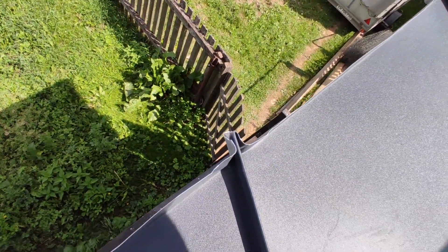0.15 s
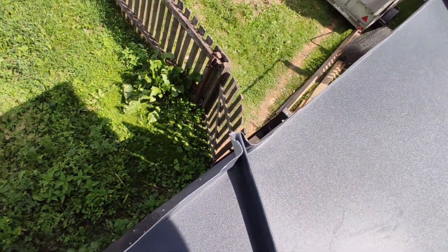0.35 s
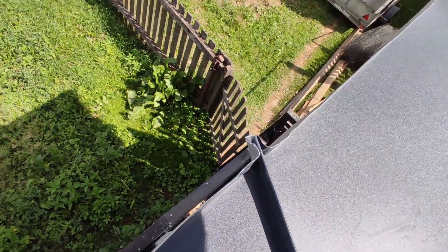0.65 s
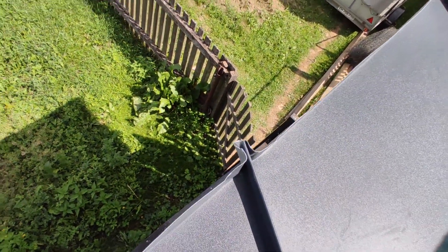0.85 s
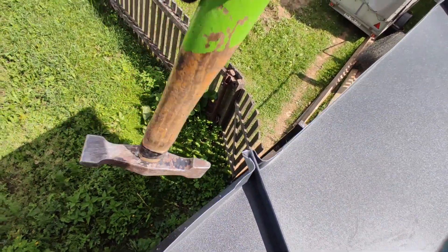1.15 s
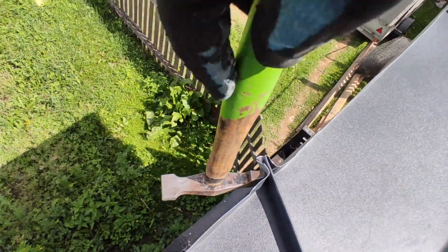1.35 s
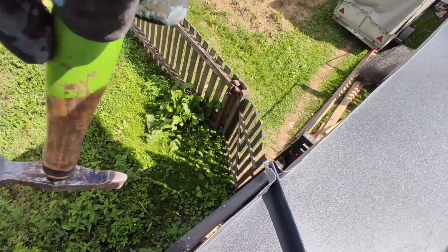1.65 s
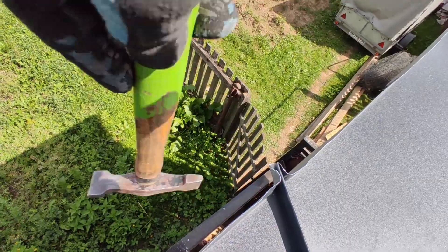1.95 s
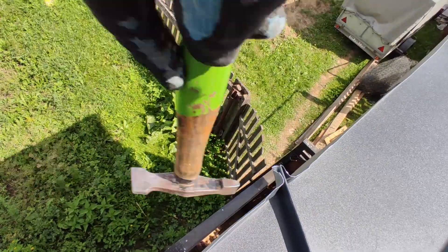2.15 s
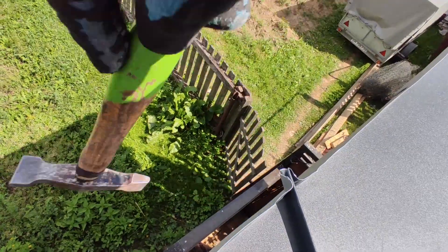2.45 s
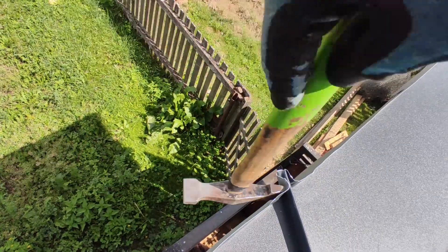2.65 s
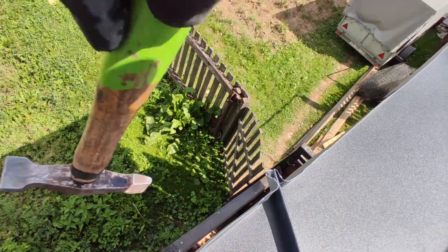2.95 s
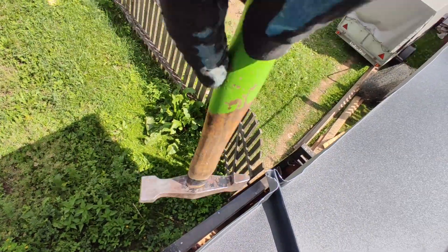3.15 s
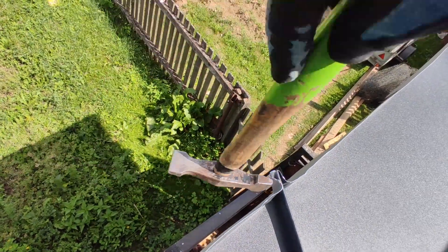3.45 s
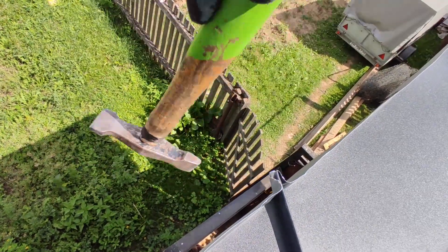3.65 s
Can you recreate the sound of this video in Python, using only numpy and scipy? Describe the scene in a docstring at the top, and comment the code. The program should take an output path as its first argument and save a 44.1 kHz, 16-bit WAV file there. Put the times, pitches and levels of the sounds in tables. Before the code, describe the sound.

A hammer strikes a sheet-metal roof seam six times, close by, at about 1.4, 1.8, 2.2, 2.7, 3.1 and 3.5 seconds. Each hit is a sharp crack with a short metallic boom, most with small rebounds, a thin high ring and a faint echo. In the first second, a sleeve swishes and cloth rustles softly. Light wind rumbles on the microphone throughout, over a quiet outdoor hiss.

```python
"""A small steel hammer strikes a folded sheet-metal roof seam six times, close by on an outdoor roof.
Each contact cracks, then the sheet and the deck below boom; the head rebounds and rings thinly,
and a far wall echoes. Before the work a sleeve swishes and cloth rustles.
Wind buffets the two microphone ports over the hiss of a quiet garden."""
import sys
import numpy as np
from scipy import signal
from scipy.fft import rfft, irfft, next_fast_len
from scipy.io import wavfile
from scipy.ndimage import map_coordinates

SR = 44100
rng = np.random.default_rng(int(sys.argv[2]) if len(sys.argv) > 2 else 0)


def pcm_store(signal):
    """Save signal as 16-bit PCM."""
    levels = np.round(np.clip(np.atleast_2d(signal), -1, 1) * 32767)
    wavfile.write(sys.argv[1], SR, levels.astype(np.int16).T)


N = 167580
TIME = np.arange(N) / SR


def amp(db):
    return 10 ** (np.asarray(db) / 20)


def unit(x):
    return x / np.sqrt(np.mean(x ** 2) + 1e-20)


def along(points, hz):
    """A table's columns read at hz, on a log frequency axis."""
    f, *cols = np.transpose(points)
    return np.squeeze([np.interp(np.log(hz + 1), np.log(f + 1), c) for c in cols])


def curves(rows):
    """One automation curve for each column after the time."""
    s, *cols = np.transpose(rows)
    return [np.interp(TIME, s, c) for c in cols]


def bell(offset, width):
    return np.exp(-.5 * (offset / width) ** 2)


def wobble(rate):
    """A smooth random curve, rate knots a second."""
    return map_coordinates(rng.standard_normal(int(N * rate / SR) + 4), [TIME * rate])


def filtered(x, response):
    """x through a complex frequency response."""
    size = next_fast_len(x.shape[-1] + 4096)
    return irfft(rfft(x, size) * response(np.fft.rfftfreq(size, 1 / SR)), size)[..., :x.shape[-1]]


def hiss(spectrum, size=N):
    """Two unrelated coloured noises of rms 1, silent outside the spectrum."""
    gain = lambda hz: amp(along(spectrum, hz)) * (hz > .8 * spectrum[0][0]) * (hz < 1.05 * spectrum[-1][0])
    return unit(filtered(rng.standard_normal((2, size)), gain))


def port_noise(size):
    """White noise, part common to both microphone ports and part their own."""
    # stereo width: f/Hz, share that only one port hears
    own_share = [(100, 0.14), (300, 0.32), (1000, 0.65), (6000, 0.6), (15000, 0.3)]
    common, *own = rng.standard_normal((3, size))
    share = lambda hz: np.clip(along(own_share, hz), 0, 1)
    return filtered(common, lambda hz: np.sqrt(1 - share(hz) ** 2)) + filtered(np.array(own), share)


def ports(x):
    """Each microphone port colours and phase-shifts what reaches it."""
    # balance: f/Hz, left over right/dB
    tilt = [(60, 4), (160, 5.5), (300, 4), (700, 3.4), (2400, -0.5), (4400, -4), (6500, -3), (8300, 15.5),
            (9800, -0.5), (12000, 1.5)]
    # phase between the ports: f/Hz, left lead/rad
    lead = [(60, 0.5), (300, -0.21), (700, -0.4), (1400, -2), (2500, -0.91), (5000, -1.73), (15000, -1.5)]
    sides = np.array([[.5], [-.5]])
    return filtered(x, lambda hz: amp(sides * along(tilt, hz)) * np.exp(1j * sides * along(lead, hz)))


def wind():
    """Gusts rumble differently on each port, and single low bumps hit one side; the deep pair near 2.25 s is
    the thud of the blow just before."""
    # wind strength: t/s, level/dB
    gusts = [(0.0, -56.5), (0.53, -49), (2.97, -62), (3.31, -54.5), (3.8, -57)]
    # rumble spectrum: f/Hz, level/dB
    rumble = [(12, -25), (20, -0.5), (32, 16), (103, -5.5), (200, -9), (260, -35.5), (440, -120)]
    # low bumps: t/s, relative level/dB, half-width/s, f/Hz, port (1 right, otherwise left); the pair near 2.25
    # s is a sub thump after the blow at 2.223 s
    bumps = [(0.243, -36, 0.093, 67, 0), (0.5, -23, 0.016, 148, 0), (0.602, -29.5, 0.022, 114, 0),
             (0.694, -28.5, 0.012, 61, 0), (0.786, -27.5, 0.028, 77.4, 0), (0.907, -25.5, 0.013, 70.4, 0),
             (0.941, -27.5, 0.0058, 66.4, 0), (1.248, -19.5, 0.007, 89, 0.42),
             (1.267, -21.5, 0.011, 111, 0), (1.32, -34, 0.02, 55, 0), (1.06, -37, 0.0097, 44, 1),
             (2.263, -18.5, 0.012, 68, 0), (2.248, -26, 0.011, 67.4, 1), (3.371, -29.5, 0.052, 55, 0)]
    flutter_db = 1.5 * np.array([wobble(8.8), wobble(5.7)])
    out = hiss(rumble) * amp(curves(gusts)[0] + [[5], [1.5]] + flutter_db)
    size = SR // 4
    for s, db, width, hz, port in bumps:
        bump = hiss([(20, -9), (hz, 0), (2.7 * hz, -14), (5 * hz, -40)], size)[0]
        start = round(s * SR) - size // 2
        out[int(port), start:start + size] += amp(db - 8.5) * bump * bell(TIME[:size] - 1 / 8, width)
    return out


def garden():
    """A bed of steady distant hiss, with a narrow noise drone that fades at the end."""
    # ambience spectrum: f/Hz, level/dB
    air_spectrum = [(71, -16.5), (120, -17), (276, -11), (505, -21.5), (942, -24), (1350, -29), (1630, -29),
                    (1900, -35.5), (2420, -32), (7260, -35), (8280, -33), (9500, -38.5), (10100, -72),
                    (14300, -86), (22000, -120)]
    # drone fader: t/s, level/dB
    drone_level = [(0.0, -67.5), (3.57, -68.5), (3.8, -93)]
    air = hiss(air_spectrum) * amp(-57.5 + 0.33 * wobble(7.8))
    drone = unit(filtered(rng.standard_normal((2, N)), lambda hz: bell(hz - 1732, width=300)))
    return ports(air + drone * amp(curves(drone_level)[0] + 2.6 * wobble(9.18)))


def sleeve_swish():
    """A band of noise climbs each time the sleeve sweeps by, over a low band that stays put."""
    # two sweeps of the sleeve: t/s, level/dB, centre f/Hz
    sweeps = [(.16, -63, 292), (.24, -54, 310), (.31, -42.5, 450), (.4, -51.5, 550), (.45, -46, 685),
              (.51, -51.5, 770), (.56, -53, 830), (.64, -70, 750), (.68, -90, 800), (1.17, -86, 260),
              (1.21, -75, 254), (1.275, -50.5, 400), (1.33, -58.5, 420), (1.37, -51, 420)]
    width_octaves, low_hz, low_db = 0.36, 350, -2
    level_db, centre_hz = curves(sweeps)
    hz, t, spectra = signal.stft(port_noise(N), SR, nperseg=512)
    band = lambda centre: bell(np.log2((hz[:, None] + 1) / centre), width_octaves)
    spectra *= band(np.interp(t, TIME, centre_hz)) + amp(low_db) * band(low_hz)
    swish = unit(signal.istft(spectra, SR, nperseg=512)[1][:, :N])
    moving = (TIME > sweeps[0][0]) & (TIME < sweeps[-1][0])
    return swish * amp(level_db + 1.2 * wobble(35.1)) * moving


def cloth_rustles():
    """Short swells of bright cloth hiss, left of centre."""
    # rustles: t/s, level/dB, rise/s, fall/s
    swells = [(0.402, -57, 0.038, 0.014), (.515, -60, 0.023, 0.025), (.545, -50.5, 0.0032, 0.0027),
              (.66, -62.5, 0.0075, .005), (.733, -56, 0.016, 0.013), (1.056, -57.5, 0.039, 0.039)]
    # cloth spectrum: f/Hz, level/dB
    cloth = [(590, -47), (1000, -16), (1520, -1.5), (3890, -7), (8160, 3.5), (13800, -26.5), (16000, -31)]
    envelope = sum(amp(db) * bell(TIME - s, np.where(TIME < s, rise, fall)) for s, db, rise, fall in swells)
    return envelope * hiss(cloth) * amp([[3], [-1.5]])


def crack(t, colour, grit_db):
    """Steel meets steel: a click and a gritty snap, with the lows rolled off."""
    click_t60, snap_t60 = 0.0041, 0.034
    click = filtered(port_noise(len(t)), lambda hz: 1 / (1 + (hz / 6500) ** 4))
    click *= amp(17 - 60 * t / click_t60)
    snap = port_noise(len(t)) * amp(-4.5 + grit_db - 60 * t / snap_t60)
    burst = (click + snap) * (1 - np.exp(-t / 0.00032))
    return filtered(burst, lambda hz: amp(along(colour, hz)) * hz ** 2 / (hz ** 2 + 1500 ** 2))


def sheet_boom(t, colour, grit_db):
    """The sheet's dense modes as bands of decaying noise; the bass blooms last."""
    # sheet vibration: f/Hz, level/dB, rise/s, t60/s, relative tail level/dB, tail t60/s
    bands = [(50, -25.5, 0.019, 0.25, -24.5, .8), (95, -29, 0.003, 0.18, -32, 0.32),
             (176, -17.5, 0.005, 0.4, -8, 0.75), (290, -11.5, 0.0029, 0.2, -13, 0.48),
             (570, -11, 0.0021, 0.074, -13.5, 0.42), (1006.6, -4, 0.0025, 0.084, -22.5, 0.34),
             (2300, -2, 0.0013, 0.086, -35.5, 0.84), (3770, -11.5, 0.0023, 0.061, -31, 0.35),
             (6020, -11.5, 0.00058, 0.038, -19, 0.26), (9560, -25, .0005, 0.044, -16.5, 0.21),
             (10200, -1.5, 0.00039, 0.032, -22.5, 0.16), (15700, -6, .0005, 0.051, -14, .16)]
    ripple_db, ripple_hz = 4, 69.33  # the modes bunch unevenly across the spectrum
    hz = np.fft.rfftfreq(len(t), 1 / SR)
    ripple = map_coordinates(rng.standard_normal(4000), [hz / ripple_hz])
    spectrum = rfft(port_noise(len(t))) * amp(ripple_db * ripple * hz / (hz + 1200))
    centres = np.append(np.geomspace(50, 6000, num=14), [7500, 9000, 10200, 12500, 15500])
    band_index = np.interp(np.log(hz + 1), np.log(centres), np.arange(len(centres)))
    out = np.zeros((2, len(t)))
    for k, centre in enumerate(centres):
        band = irfft(spectrum * np.cos(np.pi / 2 * np.clip(band_index - k, -1, 1)), len(t))
        band *= amp(grit_db * centre / (centre + 2500))  # grit roughens mostly the highs
        db, rise, t60, tail_db, tail_t60 = along(bands, centre)
        attack = 1 - np.exp(-(t / rise) ** 2)
        decay = amp(-60 * t / t60) + amp(tail_db - 60 * t / tail_t60)
        out += amp(db + along(colour, centre)) * unit(band) * attack * decay
    return out


def panel_clang(t, colour):
    """The panel's distinct modes, moving a little in pitch and level with the spot struck."""
    # panel modes: f/Hz, level/dB, t60/s
    modes = [(173, -31.5, 0.25), (253.5, -14.5, .3), (364.6, -7.5, 0.22), (614, -18.5, 0.081),
             (780, -18.5, 0.15), (893, -11, 0.15), (1183, -19.5, 0.11), (1387, -0.5, 0.037),
             (1875, -12, 0.098), (2290, -18, 0.19), (2630, -5, 0.09)]
    spot_db = rng.normal(0, 2.57, len(modes))
    detune = rng.normal(1, .02)
    clang = sum(amp(db + shift_db + along(colour, hz) - 60 * t / t60) * np.sin(2 * np.pi * hz * detune * t)
                for (hz, db, t60), shift_db in zip(modes, spot_db))
    return clang * (1 - np.exp(-t / 0.0016))


def deck_thump(t, boom_db):
    """The deck gives under the blow: one low, damped tone just after the contact."""
    hz, t60, lag_s = 281.3, 0.048, 0.0024
    age = np.maximum(t - lag_s, 0)
    envelope = amp(boom_db + 8 - 60 * age / t60) * (1 - np.exp(-age / 0.0021))
    return envelope * np.sin(2 * np.pi * hz * age)


def hammer_blows():
    """Every blow and rebound on the seam fires crack, sheet, panel and deck with its own tone colour."""
    # contacts: t/s, treble/dB, boom/dB, middle/dB, upper/dB, air/dB
    contacts = [(1.3577, -10.5, -36, -24, -19.5, -47), (1.3606, -8.5, -18.5, -19, -23.5, -35),
                (1.3742, -39, -23, -25, -61, -63), (1.4014, -29, -37.5, -24.5, -51, -67.5),
                (1.415, -40.5, -32, -34.5, -39.5, -67), (1.7875, -5, -20.5, -18, -18, -28.5),
                (1.7948, -8.5, -14, -18.5, -20, -35.5), (1.8007, -10, -17, -8, -23, -33.5),
                (1.8527, -31, -37, -21.5, -30.5, -53.5), (1.8577, -15.5, -21, -23, -36, -48),
                (2.223, -3, -13, -10.5, -15.5, -31.5), (2.6737, -4.5, -14, -9.5, -18, -27.5),
                (2.686, -16.5, -21, -21.5, -29, -47.5), (2.7139, -16, -21.5, -19, -31, -45.5),
                (2.735, -21, -42, -30, -37.5, -59), (2.75, -27, -24.5, -41.5, -35, -75),
                (3.0785, -4, -12.5, -11, -15, -29.5), (3.1037, -30.5, -21, -28.5, -37.5, -57.5),
                (3.1225, -27.5, -39.5, -27.5, -53.5, -53), (3.1319, -14.5, -18, -24.5, -31, -46.5),
                (3.1371, -35.5, -19.5, -27.5, -59.5, -59), (3.47, -5, -12.5, -12, -14.5, -28.5),
                (3.5266, -25.5, -26, -31, -37.5, -54)]
    # EQ points for boom, middle, upper, treble start, treble end and air: f/Hz
    colour_hz = 300, 1100, 2500, 6000, 9000, 10200
    onset_delay_s = 0.0004  # each contact sounds a moment after its listed time
    chatter_rate = 900  # bumps a second in the seam's folds
    t, out = TIME[:SR // 2], np.zeros((2, N + SR))
    for s, treble, boom, middle, upper, air in contacts:
        colour = list(zip(colour_hz, [boom, middle, upper, treble, treble, air]))
        grit_db = 2.5 * map_coordinates(rng.standard_normal(2000), [t * chatter_rate])
        metal = crack(t, colour, grit_db) + sheet_boom(t, colour, grit_db) + panel_clang(t, colour)
        start = round((s + onset_delay_s) * SR)
        out[:, start:start + len(t)] += metal + deck_thump(t, boom)
    return out[:, :N]


def head_ring():
    """The hammer head rings long and thin, wavering; each new ring replaces the one before."""
    # ring onsets: t/s, level/dB
    rings = [(1.362, -61.5), (1.795, -55), (1.87, -54.5), (2.224, -110), (2.675, -51), (3.078, -61.5),
             (3.14, -61), (3.473, -58.5)]
    hz, t60, waver_db = 10260, 1.1, 3
    envelope = np.zeros(N)
    for s, db in rings:
        envelope = np.where(TIME > s, amp(db - 60 * np.abs(TIME - s) / t60), envelope)
    return envelope * amp(waver_db * wobble(35)) * np.sin(2 * np.pi * hz * TIME + .6 * wobble(35))


def wall_echo(blows):
    """A far wall scatters the blows back as a faint slap with lows and highs trimmed."""
    delay_s, t60, top_hz = .143, .07, 6500
    t = TIME[:SR // 5]
    scatter = rng.standard_normal((2, len(t))) * amp(-60 * t / t60)
    delayed = np.pad(blows, ((0, 0), (round(delay_s * SR), 0)))[:, :N]
    slap = signal.fftconvolve(delayed, scatter / np.linalg.norm(scatter[0]), axes=1)[:, :N]
    return amp(-34) * filtered(slap, lambda hz: 1 / (1 + (hz / top_hz) ** 6) * hz / (hz + 600))


def scene():
    """The hammer up front, over wind, garden and the movement of clothes."""
    blows = hammer_blows()
    hammer = ports(blows + head_ring() + wall_echo(blows))
    return wind() + garden() + sleeve_swish() + cloth_rustles() + hammer


def record(dry):
    """Soft clipping near full scale, then a steep high cut."""
    ceiling, top_hz = .88, 16800
    clipped = dry / (1 + np.abs(dry / ceiling) ** 6) ** (1 / 6)
    return filtered(clipped, lambda hz: np.sin(np.pi / 2 * np.clip((top_hz - hz) / 600, 0, 1)) ** 2)


dry = scene()
out = record(dry)
pcm_store(out)
```